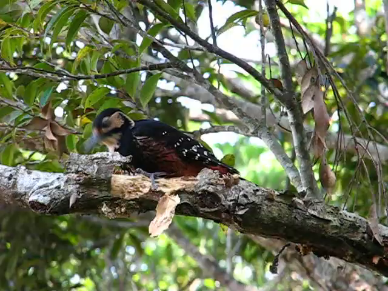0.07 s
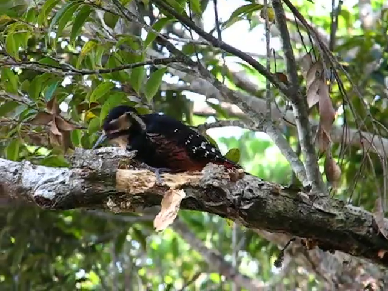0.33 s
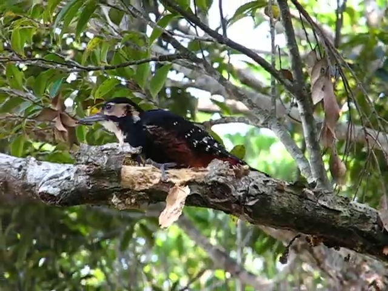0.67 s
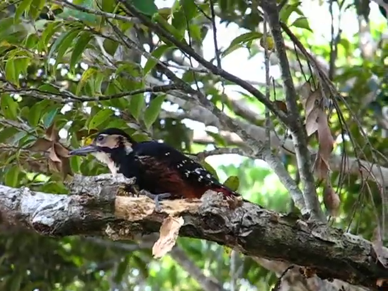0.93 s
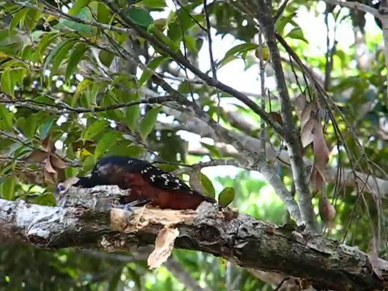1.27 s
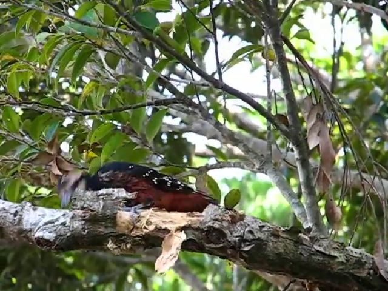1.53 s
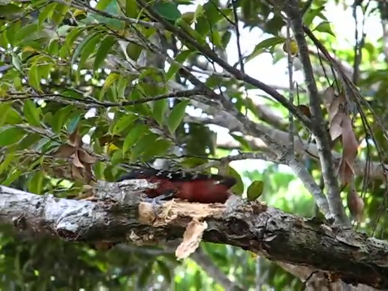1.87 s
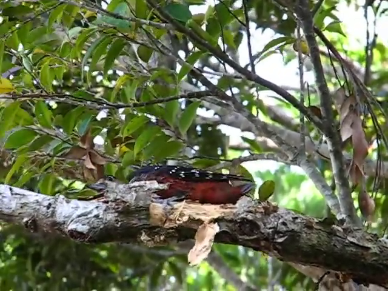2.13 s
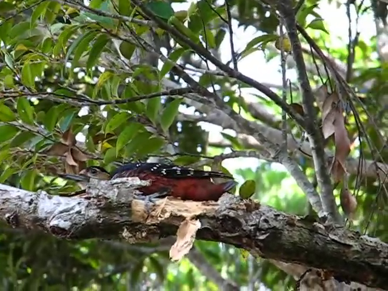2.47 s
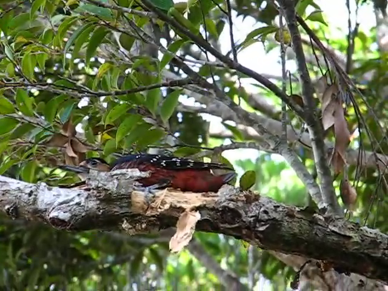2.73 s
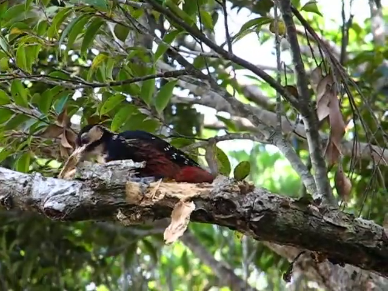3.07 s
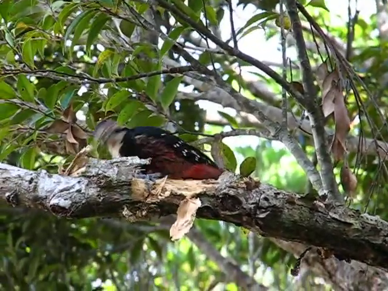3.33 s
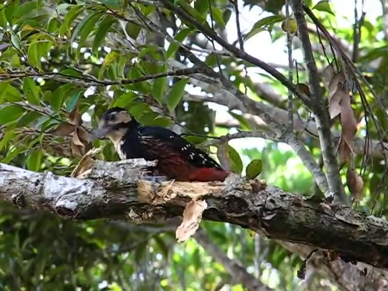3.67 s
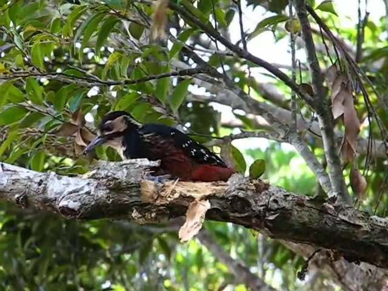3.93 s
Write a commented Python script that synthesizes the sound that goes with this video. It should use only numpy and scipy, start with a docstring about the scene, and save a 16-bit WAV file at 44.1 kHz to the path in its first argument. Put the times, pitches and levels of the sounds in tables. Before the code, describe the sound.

Dry, irregular woodpecker taps on a branch in a quiet forest, with one sharp close click.

```python
"""A few dry, uneven woodpecker pecks on a dead branch scatter through a quiet forest.
Each is a short crack of wood with a soft tail from the trees. Small birds whistle thinly,
one sharp click rings right at the microphone, and three dull thuds sit low in the mix.
Behind them swells a bed of far engine hum, rumble, distant rush and airy leaf hiss, with a
faint high whine holding its pitch; a second low hum rises and sinks away."""
import sys
import numpy as np
from scipy import signal
from scipy.fft import rfft, irfft, next_fast_len
from scipy.io import wavfile
from scipy.ndimage import uniform_filter1d, map_coordinates

SR = 44100
rng = np.random.default_rng(int(sys.argv[2]) if len(sys.argv) > 2 else 0)


def wav_out(sig):
    """Save sig, one row per channel (or a flat mono array), as 16-bit PCM at SR to the path in sys.argv[1]."""
    wavfile.write(sys.argv[1], SR, np.round(np.clip(np.atleast_2d(sig).T, -1, 1) * 32767).astype(np.int16))


N = 176400

# EQ of the tree echo and the click's rattle (frequency [Hz], level [dB])
SCATTER_EQ = [(150, -3), (700, -5), (1500, -6), (2600, -4.5), (4200, -0.5), (6500, 1), (8500, 1.5),
              (10200, -12), (15500, -31)]
FOREST_T60_S, BED_START_S = 0.25, 0.072


def amp(db):
    """Decibels to gain."""
    return 10 ** (np.asarray(db) / 20)


def unit(x):
    """Scale to rms 1."""
    return x / np.sqrt(np.mean(x ** 2) + 1e-20)


def along(points, hz):
    """Read a curve of (frequency [Hz], value) points on a log axis."""
    freqs, values = np.transpose(points)
    return np.interp(np.log(hz + 1), np.log(freqs + 1), values)


def wobble(rate):
    """A smooth random curve, rate knots a second."""
    return map_coordinates(rng.standard_normal(int(N * rate / SR) + 4), [np.arange(N) * rate / SR])


def filtered(x, response):
    """Zero-phase EQ; response maps Hz to gain."""
    size = next_fast_len(x.shape[-1] + 8192)
    return irfft(rfft(x, size) * response(np.fft.rfftfreq(size, 1 / SR)), size)[..., :x.shape[-1]]


def coloured(shape, response):
    """Noise of rms 1 through an EQ."""
    return unit(filtered(rng.standard_normal(shape), response))


def fade(t, t60):
    """Exponential decay, 60 dB down at t60."""
    return np.exp(-np.log(1000) * t / t60)


def tone(hz):
    """A sine of rms 1 that follows a pitch curve."""
    return np.sqrt(2) * np.sin(2 * np.pi * np.cumsum(hz) / SR)


def add(out, at, x):
    """Mix x into out, starting at a time in seconds."""
    i = round(at * SR)
    out[:, i:i + x.shape[-1]] += x[..., :N - i]


def pecks(ring_width_hz=1300, stereo_spread=0.34, echo_ring_share=0.72, echo_rise_s=0.0024, pan_db=1.1):
    """The bill cracks the dead wood for a few milliseconds; trunks and leaves scatter it back."""
    # bill strikes (time [s], crack [dB], crack t60 [s], echo [dB], ring pitch [Hz], ring boost [dB])
    strikes = [(.152, -49, 0.045, -64, 2400, 24), (1.0482, -38.5, .008, -56, 6500, 0),
               (1.0728, -36.5, .01, -46.5, 7500, 0), (1.259, -27.5, .024, -36, 2370, 7),
               (1.5000, -35, 0.026, -48, 3000, 0), (1.5035, -27, 0.019, -34.5, 8700, 9),
               (1.6972, -30, 0.015, -36, 7400, 9), (1.703, -21.5, 0.013, -38.5, 3200, 7),
               (1.8787, -23.5, 0.0078, -38.5, 2640, 4), (2.9954, -40, 0.037, -37, 7500, 6),
               (3.3417, -34, 0.0095, -47.5, 7000, 6), (3.768, -46, 0.011, -47.5, 6000, 0)]
    # EQ of the cracking wood (frequency [Hz], level [dB])
    wood_eq = [(150, -22), (700, -8), (1300, -1.5), (2600, 1.5), (4200, -1), (6500, 4.5), (8400, 0.5),
               (10000, -18), (12000, -24), (15500, -35)]
    out, t = np.zeros((2, N)), np.arange(SR // 2) / SR
    for at, crack_db, t60, echo_db, ring_hz, ring_db in strikes:
        ring = lambda hz: ring_db / (1 + (2 * (hz - ring_hz) / ring_width_hz) ** 2)  # the struck spot
        splinters = rng.standard_normal(len(t)) + stereo_spread * rng.standard_normal((2, len(t)))
        crack = unit(filtered(splinters, lambda hz: amp(along(wood_eq, hz) + ring(hz))))
        echo = coloured((2, len(t)), lambda hz: amp(along(SCATTER_EQ, hz) + echo_ring_share * ring(hz)))
        add(out, at, amp(crack_db) * crack * fade(t, t60))
        add(out, at, amp(echo_db) * echo * fade(t, FOREST_T60_S) * (1 - np.exp(-t / echo_rise_s)))
    return out * amp([[-pan_db], [pan_db]])


def click(at=0.46692, left_lag_s=0.00002, rise_s=0.00004, rattle_db=-21.5, low_cut_hz=330):
    """A hard, dry click at the microphone: fast-dying modes and a few milliseconds of rattle."""
    # resonances (frequency [Hz], left [dB], right [dB], t60 [s], right polarity [+1 or -1])
    modes = [(527, -34, -21, 0.026, 1), (910, -26.5, -29, 0.029, 1), (1150, -22, -37, 0.032, 1),
             (1460, -34, -19, 0.016, 1), (2740, -26, -28, 0.0075, 1), (3750, -9, -5.5, 0.0018, -1),
             (5300, -11, -19.5, 0.0036, 1), (6670, -12, 0.5, 0.0018, 1), (8230, -15, 1.5, 0.0025, 1),
             (9800, -13, 0.5, 0.0014, 1), (12570, -21, 2.5, 0.002, 1)]
    out = np.zeros((2, N))
    t = np.maximum(np.arange(SR // 10) / SR - np.array([[left_lag_s], [0]]), 0)
    ring = np.zeros(t.shape)
    for k, (hz, left_db, right_db, t60, polarity) in enumerate(modes):
        gains = amp([[left_db], [right_db]]) * [[1], [polarity]]
        ring += (-1) ** k * gains * np.sin(2 * np.pi * hz * t) * fade(t, t60)
    rattle = coloured(t.shape, lambda hz: amp(along(SCATTER_EQ, hz))) * fade(t, t60=0.013)
    add(out, at, (ring + amp(rattle_db) * rattle) * (1 - np.exp(-t / rise_s)))
    return signal.sosfilt(signal.butter(2, low_cut_hz, "high", fs=SR, output="sos"), out)


def bird_whistles(rasp_depth=0.0296, flutter_db=2, reverb_gain=1.14):
    """Far small birds: thin wavering notes that rise and level off, blurred by the trees."""
    # bird notes (time [s], length [s], start pitch [Hz], end pitch [Hz], level [dB])
    notes = [(0.268, 0.065, 3600, 3820, -60), (0.999, .062, 3400, 3840, -53), (1.31, .05, 2200, 2415, -53),
             (1.339, 0.16, 6540, 7010, -43.5), (1.804, 0.018, 2450, 2510, -50),
             (2.545, .05, 13450, 13550, -65), (3.08, 0.017, 1846, 2020, -44)]
    t, song = np.arange(N) / SR, np.zeros(N)
    for at, length, start_hz, end_hz, db in notes:
        progress = np.clip((t - at) / length, 0, 1)
        glide_hz = end_hz + (start_hz - end_hz) * (1 - progress) ** 2
        hz = glide_hz * (1 + rasp_depth * wobble(1300))
        envelope = amp(db + flutter_db * wobble(81)) * np.sqrt(np.abs(np.sin(np.pi * progress)))
        song += envelope * np.sin(2 * np.pi * np.cumsum(hz) / SR)
    tail = rng.standard_normal((2, SR // 2)) * fade(t[:SR // 2], FOREST_T60_S)
    reverb = signal.fftconvolve(song[None], tail / np.linalg.norm(tail[0]), axes=1)[:, :N]
    return song + reverb_gain * reverb


def thuds(rise_s=0.007, width_octaves=0.93, makeup_gain=2):
    """Dull bursts of low noise with a soft attack."""
    # low hits (time [s], centre [Hz], level before makeup gain [dB], t60 [s])
    hits = [(1.72, 250, -38.5, 0.13), (1.755, 115, -37, 0.23), (2.424, 95, -32.5, 0.13)]
    out, t = np.zeros((2, N)), np.arange(SR // 2) / SR
    for at, centre_hz, db, t60 in hits:
        body = coloured(len(t), lambda hz: np.exp(-(np.log2((hz + 1) / centre_hz) / width_octaves) ** 2))
        add(out, at, amp(db) * body * fade(t, t60) * (1 - np.exp(-t / rise_s)))
    return makeup_gain * out


def engine_hum(pitch_hz=75.1, drift=0.016, waver_db=1.54, flutter_db=1.34, pan_db=0.77):
    """A far engine: low partials, each wandering in pitch and level."""
    # engine partials (multiple of the pitch [ratio], level [dB])
    partials = [(.5, -55), (1, -43), (1.53, -55.5), (2, -53), (3, -53.5), (4, -62), (7, -53.5),
                (8.23, -59.5)]
    hum = np.zeros(N)
    for multiple, db in partials:
        gain = amp(db + waver_db * wobble(7) + flutter_db * wobble(35))
        hum += gain * tone(pitch_hz * (multiple + drift * wobble(24.97) * np.sqrt(multiple)))
    return hum * amp([[pan_db], [-pan_db]])


def drone(pitch_hz=142.5, drift_hz=3, waver_db=2):
    """A second low hum: one unsteady sine that swells and sinks back."""
    # fader ride (time [s], level [dB])
    ride = [(.1, -58), (.7, -56), (.9, -47), (1.45, -45), (1.7, -51), (2.2, -51), (2.8, -60), (4, -65)]
    times, db = np.transpose(ride)
    t = np.arange(N) / SR
    gain = amp(np.interp(t, times, db) + waver_db * wobble(9)) * (t > BED_START_S)
    return gain * tone(pitch_hz + drift_hz * wobble(12))


def whine(pitch_hz=8010, jitter_hz=4.1, core_db=-58.5, right_db=-4, halo_db=-61, halo_width_hz=280):
    """A faint high sine, left of centre, in a narrow halo of noise."""
    core = tone(pitch_hz + jitter_hz * wobble(160)) * amp([[0], [right_db]])
    halo = coloured((2, N), lambda hz: np.exp(-((hz - pitch_hz) / halo_width_hz) ** 2))
    return amp(core_db) * core + amp(halo_db) * halo


def rush(eq, patchy_db):
    """Stereo noise of rms 1 that flickers in patches, narrow in the lows and wide in the highs."""
    # stereo image (frequency [Hz], left-right correlation [0 to 1])
    correlation = [(60, 0.77), (130, 1), (290, 0.91), (640, 1), (1410, 0.54), (3100, 0.12), (6820, 0.022),
                   (15000, 0.05)]
    # stereo balance (frequency [Hz], left minus right [dB])
    balance = [(30, 0), (70, 3.5), (300, 0.9), (900, 2), (1400, 0), (2200, -3.5), (4400, 2), (8000, 0.5),
               (15000, -0.5)]
    spectra = signal.stft(rng.standard_normal((2, N)), nperseg=512)[2]
    patches = uniform_filter1d(rng.standard_normal(spectra.shape[1:]), size=6, axis=0)  # across pitch
    patches = unit(uniform_filter1d(patches, size=14, axis=1))  # across time
    pair = signal.istft(spectra * amp(patchy_db * patches), nperseg=512)[1][:, :N]
    angle = lambda hz: np.arccos(np.clip(along(correlation, hz), -1, 1)) / 2
    mid, side = filtered(pair, lambda hz: amp(along(eq, hz)) * [np.cos(angle(hz)), np.sin(angle(hz))])
    stereo = np.array([mid + side, mid - side])
    return unit(filtered(stereo, lambda hz: amp(along(balance, hz) * np.array([[.5], [-.5]]))))


def forest_bed(rumble_db=-44, far_db=-43, leaves_db=-50):
    """Engine, rumble, distant rush, leaf hiss and whine, swelling in on three faders."""
    # fader rides on top of the layers' levels (time [s], bass [dB], middle [dB], treble [dB])
    swell = [(.07, -9, -11, -9.5), (.25, -8.5, -10, -7), (.45, -5.5, -5.5, -3.5), (.6, -7, -6, -5),
             (.8, -1.5, -3, -1), (1.1, -1.5, -1, 0), (1.6, -1, -0.5, 0.5), (2, -1, 0.5, 0),
             (2.7, -0.5, 1.5, 0.5), (3.3, -1, 1.5, 0), (4, 0.5, 0, 0.5)]
    # EQ of the low rumble (frequency [Hz], level [dB])
    rumble_eq = [(20, 1.5), (35, -9), (48, 5), (70, 4), (100, -3.5), (200, 1.5), (300, -7.5), (450, -16.5),
                 (900, -53)]
    # EQ of the distant rush (frequency [Hz], level [dB])
    far_eq = [(150, -19), (330, -5), (450, -3), (560, 0), (750, 0.5), (1000, -3.5), (1150, -8.5),
              (1800, -9), (3000, -21.5), (6000, -58)]
    # EQ of the leaves and hiss (frequency [Hz], level [dB])
    leaves_eq = [(500, -28), (1500, -1), (2600, 5.5), (4000, 1.5), (5500, 0), (7200, 1), (8200, -2),
                 (9300, -6.5), (11000, -12), (13500, -14), (15800, -17)]
    t = np.arange(N) / SR
    times, *rides = np.transpose(swell)
    bass, middle, treble = [amp(np.interp(t, times, db)) for db in rides]
    engine, high_whine = engine_hum(), whine()
    rumble = amp(rumble_db) * rush(rumble_eq, patchy_db=1.0)
    far = amp(far_db + 0.28 * wobble(8)) * rush(far_eq, patchy_db=1.5)
    leaves = amp(leaves_db) * rush(leaves_eq, patchy_db=1.55)
    return (bass * (engine + rumble) + middle * far + treble * (leaves + high_whine)) * (t > BED_START_S)


def scene():
    """Everything heard from under the branch."""
    return pecks() + click() + bird_whistles() + thuds() + forest_bed() + drone()


def record(dry):
    """Clip at full scale, then cut the very top with a steep low-pass."""
    cutoff_hz, slope_width_hz = 15900, 300
    return filtered(np.clip(dry, -1, 1), lambda hz: np.clip((cutoff_hz - hz) / slope_width_hz + .5, 0, 1))


dry = scene()
out = record(dry)
wav_out(out)
```